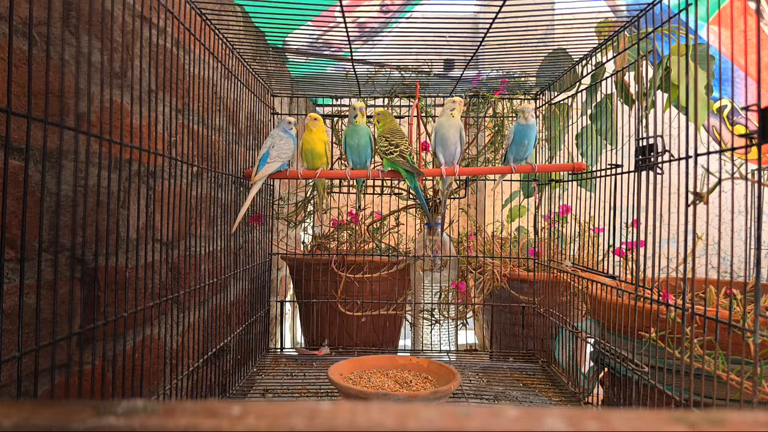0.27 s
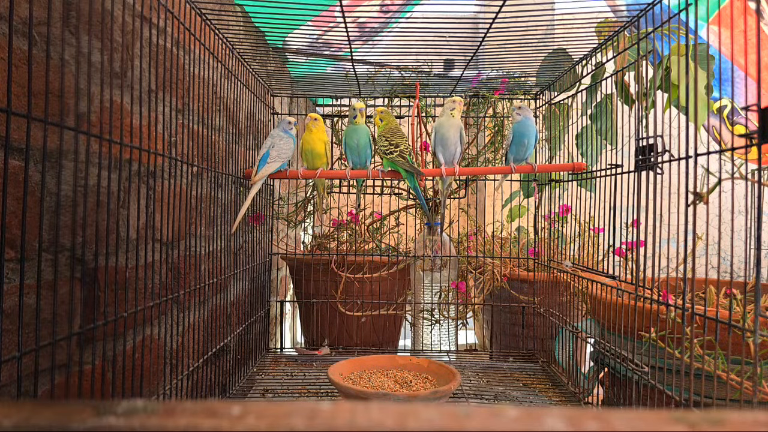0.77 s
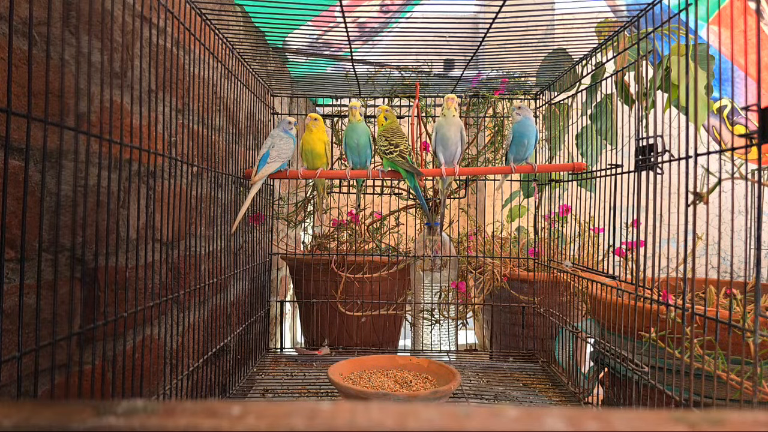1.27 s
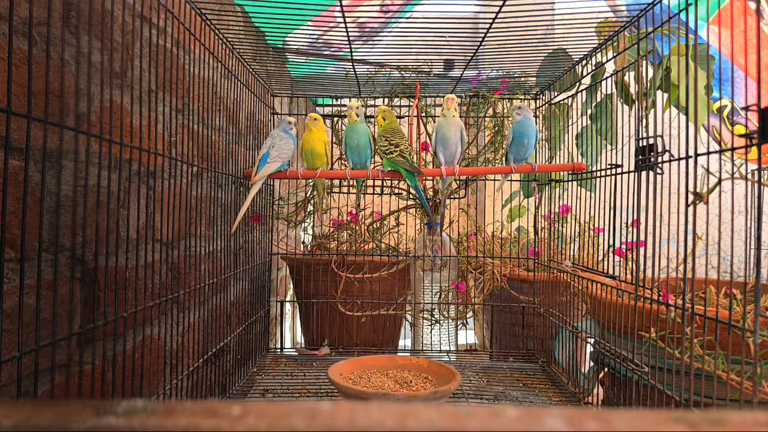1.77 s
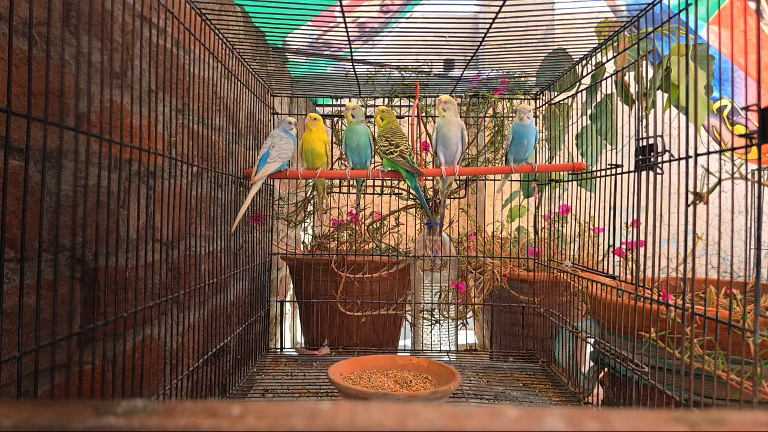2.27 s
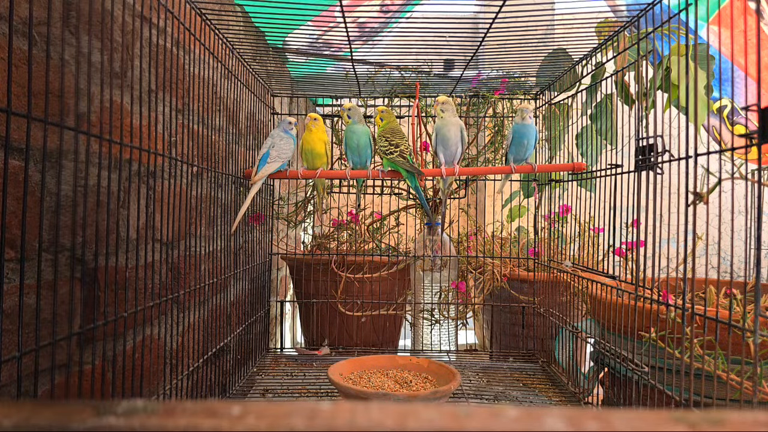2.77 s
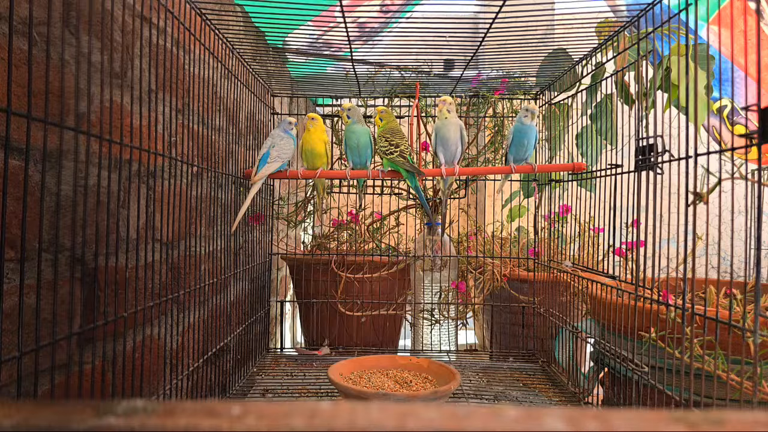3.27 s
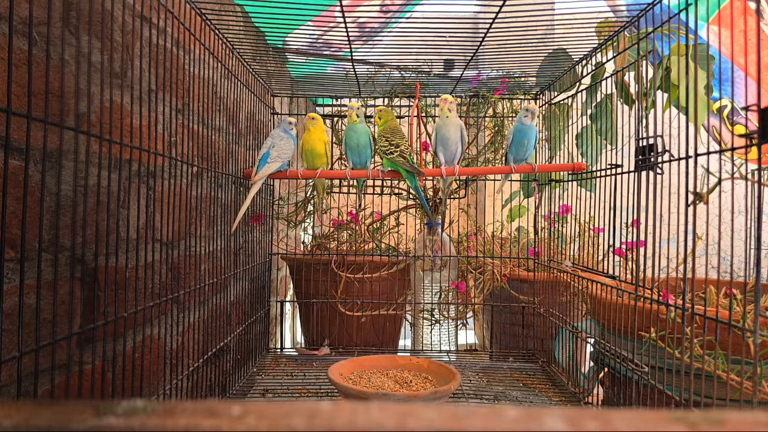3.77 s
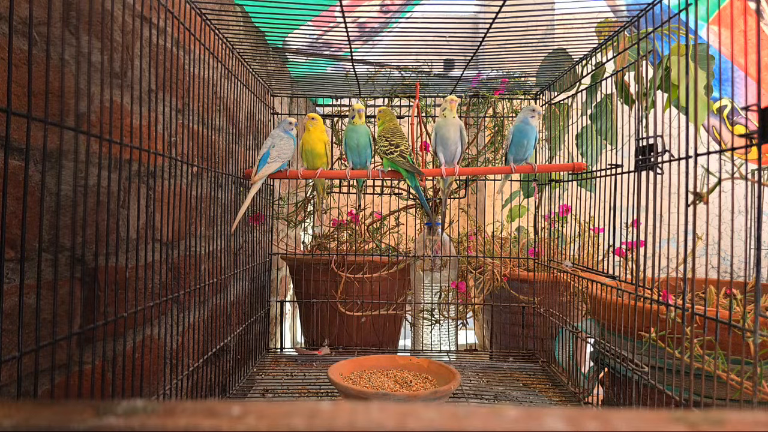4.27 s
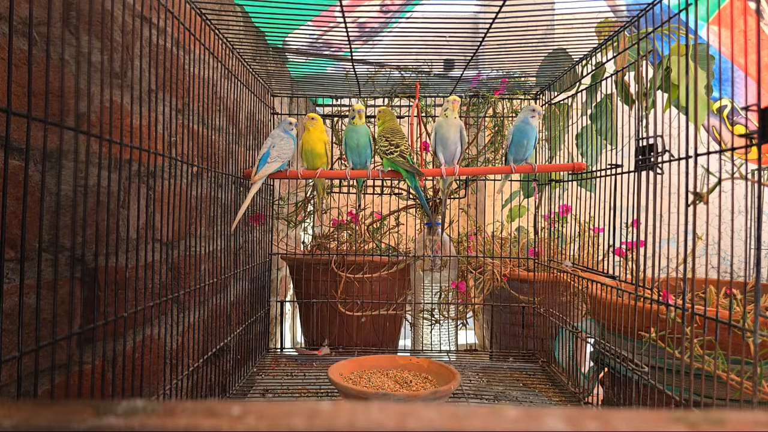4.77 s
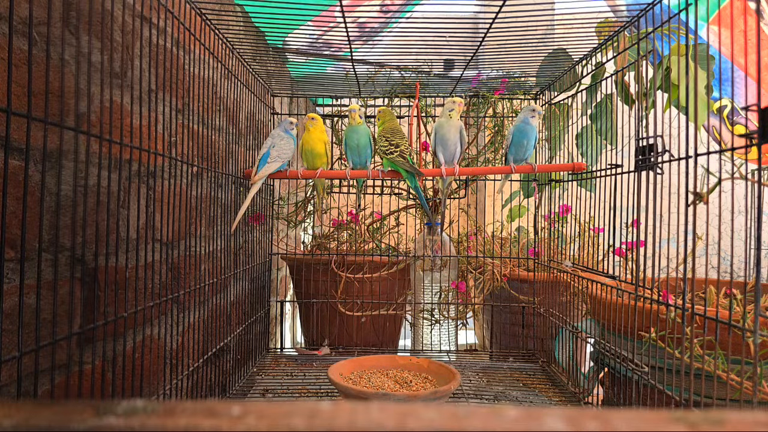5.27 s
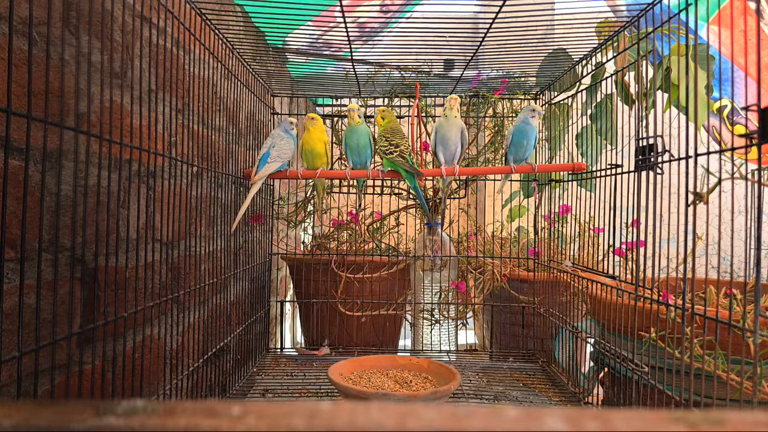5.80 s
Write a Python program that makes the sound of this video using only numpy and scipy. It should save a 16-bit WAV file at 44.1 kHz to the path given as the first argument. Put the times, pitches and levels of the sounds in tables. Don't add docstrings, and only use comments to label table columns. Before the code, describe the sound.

Close budgerigars give paired contact chirps, each about a tenth of a second: a bright, rasping high call, then a softer, lower answer. Pairs come at the start, middle and end, with long gaps. Underneath, low traffic booms and faint hiss rise and fade; distant birds tremble quietly, and a far car horn sounds briefly around two seconds. Near walls add a short reverberation to a close phone-type microphone.

```python
import sys
import numpy as np
from scipy import signal
from scipy.fft import rfft, irfft, next_fast_len
from scipy.io import wavfile
from scipy.ndimage import map_coordinates

SR = 44100
rng = np.random.default_rng(int(sys.argv[2]) if len(sys.argv) > 2 else 0)


def attenuation_scalar(level_db):
    decades = np.asarray(level_db, float) / 20
    return 10 ** decades


def file_out(sig):
    cols = np.atleast_2d(sig).T
    lim = np.clip(cols, -1, 1)
    pcm = np.round(lim * 32767).astype(np.int16)
    wavfile.write(sys.argv[1], SR, pcm)


N = 266275

# start_s, length_s, rasp_db, low_rasp_over_it_db, air_over_it_db
HIGH_CALLS = [
    (0.253, 0.13, -0.5, -2, 7.5),
    (3.084, .122, 0.5, -6.5, -1),
    (5.459, 0.13, 1.5, 7, -4.5),
]
# start_s, length_s, rasp_db, low_rasp_over_it_db, air_over_it_db
LOW_CALLS = [
    (0.838, 0.11, -0.78, 8, 0),
    (3.314, 0.11, 0.17, 3.5, 0.11),
    (5.735, 0.1114, 0.29, 5.5, 0.76),
]
BREATH_S = 0.013


def unit(x):
    return x / np.sqrt(np.mean(x ** 2) + 1e-20)


def along(points, hz):
    f, v = np.transpose(points)
    return np.interp(np.log(hz + 1), np.log(f + 1), v)


def curves(rows, outside=None):
    s, *columns = np.transpose(rows)
    t = np.arange(N) / SR
    return np.array([np.interp(t, s, c, outside, outside) for c in columns])


def wobble(rate):
    knots = rng.standard_normal(int(N * rate / SR) + 4)
    return map_coordinates(knots, [np.arange(N) * rate / SR])


def filtered(x, gain):
    m = next_fast_len(N + 8192)
    return irfft(rfft(x, m) * gain(np.fft.rfftfreq(m, 1 / SR)), m)[:N]


def noise(spectrum):
    return unit(filtered(rng.standard_normal(N), lambda hz: attenuation_scalar(along(spectrum, hz))))


def echoes(x, t60, gap):
    hz, t, z = signal.stft(rng.standard_normal(SR // 2), SR, nperseg=128)
    decay = attenuation_scalar(-60 * t / along(t60, hz)[:, None])
    tail = signal.istft(z * decay, SR, nperseg=128)[1]
    delayed = np.pad(x, (int(gap * SR), 0))
    return signal.fftconvolve(delayed, tail / np.linalg.norm(tail))[:N]


def hiss(swing_db):
    # frequency_hz, density_db
    hiss_spectrum = [(700, -29), (1200, -1), (2400, -8.5), (3400, -13), (7000, -18), (12500, -15.5),
                     (16000, -19)]
    return attenuation_scalar(-83 + .2 * swing_db + .9 * wobble(3.3)) * noise(hiss_spectrum)


def traffic():
    # time_s, firing_rate_hz, share_of_rumble (0-1)
    engine_pass = [(0, 17.2, .5), (.4, 18.3, .7), (.9, 20.9, .7), (1.25, 22.2, .6), (1.9, 24.3, .7),
                   (2.3, 25.2, .6), (2.8, 24.7, .4), (3.5, 25, .08), (6.04, 25.5, .08)]
    # time_s, level_db
    road = [(0.0, -33), (0.47, -44), (0.64, -46.5), (0.82, -46.5), (1.02, -41), (1.6, -47.5), (1.93, -43.5),
            (2.72, -44.5), (3.85, -58.5), (5.35, -47), (5.92, -59), (6.04, -62.5)]
    # centre_s, width_s, thud_over_mean_db
    lorries = [
        (0, 0.47, 3.5),
        (1.799, 0.56, -10),
        (2.8, 0.44, 12),
    ]
    # frequency_hz, density_db
    thud = [(22, -40), (45, -20), (64, -9), (77, 0), (90, -10), (110, -22), (200, -80)]
    boom = [(80, -60), (108, -26), (120, -5), (128, 0), (137, -9), (150, -17), (170, -30), (260, -80)]
    roar = [(100, -40), (165, -6), (250, -10), (288, -11), (300, 0), (312, -12), (580, -23), (2500, -51),
            (5500, -120)]

    firing_hz, share = curves(engine_pass)
    share = np.clip(share, 0, 1)
    turns = np.cumsum(firing_hz * (1 + .012 * wobble(6.1))) / SR
    firings = np.diff(np.floor(turns), prepend=0) * attenuation_scalar(0.98 * wobble(24))
    firings = echoes(firings, [(50, 0.17), (500, 1.0)], gap=0)

    t = np.arange(N) / SR
    boom_db = curves(road)[0]
    swing_db = boom_db - boom_db.mean()
    thud_db = -57.5 + sum(db * np.exp(-((t - s) / width) ** 2) for s, width, db in lorries)
    roar_db = boom_db.mean() - 11 + 0.65 * swing_db
    out = hiss(swing_db)
    for db, spectrum in zip([thud_db, boom_db, roar_db], [thud, boom, roar]):
        engine = unit(filtered(firings, lambda f: attenuation_scalar(along(spectrum, f)) / (1 + (f / 450) ** 4)))
        tyres = attenuation_scalar(1.6 * wobble(7)) * noise(spectrum)
        out += attenuation_scalar(db) * (np.sqrt(share) * engine + np.sqrt(1 - share) * tyres)
    return out


def horn():
    # multiple, level_db
    partials = [(4, -87), (5, -87), (6, -71), (7, -75), (8, -80), (9, -82), (12, -95)]
    # time_s, level_db
    blast_points = [
        (1.74, -36.5),
        (1.76, -10.5),
        (1.95, 0),
        (2.04, -1),
        (2.17, -5.5),
        (2.24, -13),
        (2.3, -15),
        (2.36, -44),
    ]
    phase = 2 * np.pi * np.cumsum(429.6 + 1.6 * wobble(18)) / SR
    buzz = sum(attenuation_scalar(db + 3 + 4 * wobble(16)) * np.sin(k * phase) for k, db in partials)
    blur_spectrum = [(1200, -28.0), (2300, -2), (3200, -2.5), (4200, -12), (6000, -25), (11000, -31.5)]  # Hz, dB
    blur = attenuation_scalar(-68) * noise(blur_spectrum)
    blast = attenuation_scalar(curves(blast_points, outside=-89.5)[0])
    return blast * (blast * buzz + blur)


def far_calls():
    # start_s, length_s, pitch_hz, warble_hz, level_db
    chatter = [(0, 0.055, 2545, 40.4, -63), (.08, .1, 4950, 200, -83), (0.62, .2, 1956, 132.4, -75),
               (0.659, 0.079, 4710, 151.3, -88), (1.202, .1, 1700, 59.7, -90), (1.43, 0.15, 3400, 251, -87),
               (1.615, 0.3, 1100, 200, -80), (1.912, 0.2, 1903, 220.4, -71), (2.33, 0.18, 852, 119.7, -70),
               (2.546, 0.17, 3700, 201, -83.5), (2.78, 0.098, 5000, 200.5, -88),
               (2.896, 0.16, 1637, 119.7, -69.5), (3.533, 0.13, 1700, 99.5, -79.5),
               (3.6, 0.078, 5000, 196.6, -91), (3.674, .22, 401, 49.1, -71), (4.079, 0.24, 1710, 88.6, -82),
               (4.104, 0.27, 3550, 222, -76), (4.43, 0.14, 5200, 202, -84.5), (4.6, .08, 2000, 200, -82),
               (4.719, .3, 3500, 221, -76.5), (4.918, 0.074, 1700, 589, -77.5),
               (4.152, 0.26, 2780, 598, -83.5), (5.22, 0.15, 4300, 151.3, -85),
               (5.267, 0.2, 2000, 130.3, -74.5)]
    out = np.zeros(N)
    t = np.arange(N) / SR
    tremble = wobble(380) * np.abs(wobble(83)) + 0.49 * wobble(43)
    for s, length, hz, warble_hz, db in chatter:
        u = np.clip((t - s) / length, 0, 1)
        phase = 2 * np.pi * np.cumsum(hz + 1.3 * warble_hz * tremble) / SR
        out += attenuation_scalar(db + 4) * np.sin(np.pi * u) ** .6 * np.sin(phase)
    return 0.7 * out + echoes(out, [(1000, .4), (5000, .3)], gap=0.02)


def unrest():
    steady, raw, settle_s = .6, 1.9, .05
    t = np.arange(N) / SR
    starts = [call[0] for call in HIGH_CALLS + LOW_CALLS]
    return steady + raw * sum((t > s - BREATH_S) * np.exp(-(np.maximum(t - s, 0) / settle_s) ** 2) for s in starts)


def tune(rows):
    pull, pull_max_hz, rise_hz_per_s = .3, 200, 3500
    s, length, hz, db = np.transpose(rows)
    step = np.append(np.diff(hz) * (np.diff(s) < .1), 0)
    bend = np.clip(pull * step, -pull_max_hz, pull_max_hz) + rise_hz_per_s * length
    return list(zip(s, length, hz, bend, db))


def graces(calls, pattern):
    detune, scatter_db = .012, 1.5
    chance = iter(rng.standard_normal((len(calls) * len(pattern), 2)))
    return [(call[0] + s, length, hz * (1 + detune * a), bend, db + scatter_db * b)
            for call in calls for (s, length, hz, bend, db), (a, b) in zip(pattern, chance)]


def warble():
    # start_s, length_s, pitch_hz, peak_db
    high_tune = [(.256, 0.014, 3600, -14.5), (.274, 0.018, 3253, -11.5), (.298, 0.0019, 3173, -11.5),
                 (.302, 0.019, 3600, -6.5), (.319, .007, 3764, -12.5), (.328, 0.014, 3687, -5),
                 (.343, 0.011, 2965, -13.5), (.353, 0.017, 3220, -11), (.369, 0.0096, 3575, -5),
                 (.382, 0.009, 3505, -8.5), (3.084, .009, 3220, -18.5), (3.1, 0.023, 3190, -10.5),
                 (3.121, 0.011, 3070, -11), (3.132, 0.017, 3673, -4), (3.157, 0.012, 3686, -7),
                 (3.166, 0.012, 3250, -11.5), (3.176, 0.021, 3130, -7.5), (3.197, 0.014, 3086, -15.5),
                 (3.2, 0.013, 3546, -5), (5.454, 0.012, 3510, -18), (5.467, .014, 3670, -19),
                 (5.478, 0.031, 3090, -19), (5.503, .019, 2910, -11.5), (5.531, 0.0079, 3150, -10.5),
                 (5.533, 0.014, 3606, -5), (5.55, 0.0099, 3700, -12), (5.561, 0.012, 2823, -11),
                 (5.563, 0.014, 3627, -13.5), (5.579, 0.01, 2892, -12), (5.586, 0.0067, 3280, -18)]
    low_tune = [(.84, 0.0038, 3475, -22.5), (.852, 0.0062, 2815, -17.5), (.862, 0.0017, 2540, -17),
                (.874, 0.0087, 2650, -19.5), (.884, 0.0038, 2650, -17), (.9, .008, 2310, -21),
                (.908, 0.0051, 2641, -10.5), (.917, .004, 2807, -16.5), (.925, .016, 2714, -9.5),
                (.94, 0.012, 3018, -21), (3.322, 0.0079, 3024, -28.5), (3.33, 0.018, 2610, -23.5),
                (3.347, .017, 2685, -26.5), (3.357, 0.0033, 2445, -27), (3.371, 0.0031, 2674, -12.5),
                (3.382, 0.013, 2706, -12), (3.403, 0.013, 2720, -14), (3.416, 0.011, 3100, -18.5),
                (3.42, 0.0086, 2857, -26.5), (5.733, 0.012, 3440, -19), (5.745, 0.011, 2775, -20),
                (5.765, 0.0037, 2615, -15.5), (5.781, 0.02, 2639, -17), (5.793, 0.0053, 2696, -22.5),
                (5.803, 0.016, 2661, -12), (5.819, 0.0056, 2760, -8), (5.833, 0.016, 2760, -23.5),
                (5.837, .009, 3100, -20.5)]
    # start_s, length_s, pitch_hz, bend_hz, peak_db
    high_grace = [(.008, 0.035, 4520, -100, -25.5), (.013, .008, 2910, 20, -15.5),
                  (.03, .016, 2500, -400, -28.5), (0.053, .009, 3190, 84.5, -21),
                  (0.09, .008, 3620, -71, -14.5), (.115, 0.012, 3100, 61.5, -15),
                  (.138, 0.0099, 3580, -61, -16.5)]
    low_grace = [(.001, 0.016, 4025, -500, -30.5), (.011, .012, 3282, -700, -23),
                 (.023, 0.016, 2160, 87.5, -20.5), (.07, .007, 2340, 28.5, -19),
                 (.115, .013, 2858, 296.5, -27.5)]
    # start_s, length_s, pitch_hz, bend_hz, peak_db
    neighbour = [
        (5.488, 0.0094, 2014, -36, -25.5),
        (5.504, .006, 4510, 56, -18.5),
        (5.515, .008, 4350, -120, -17.5),
        (5.516, .012, 2037, -250, -28),
        (5.551, 0.0066, 1828, 173.5, -24),
    ]
    # multiple, level_db
    overtones = [(2, -28), (3, -38)]

    notes = tune(high_tune) + tune(low_tune) + neighbour
    notes += graces(HIGH_CALLS, high_grace) + graces(LOW_CALLS, low_grace)
    out = np.zeros(N + SR)
    quaver_hz = 45 * unrest() * wobble(400)
    flutter_db = 1.76 * unrest() * wobble(450)
    for (s, length, hz, bend, db), (start, gape) in zip(notes, rng.random((len(notes), 2))):
        first, n = round((s - .0015) * SR), round((length + 0.0032) * SR)
        span = slice(first, first + n)
        u = np.arange(n) / n
        phase = 2 * np.pi * (np.cumsum(hz + bend * u + quaver_hz[span]) / SR + start)
        arch = np.minimum(1, 1.45 * np.sin(np.pi * u ** 1.2))
        swell = np.sin(np.pi / 2 * arch) ** 2
        bright_db = 9 * (gape - .5) + 0.6 * (db + 8.5)
        tone = np.sin(phase) + sum(attenuation_scalar(g + bright_db) * np.sin(k * phase) for k, g in overtones)
        out[span] += swell * attenuation_scalar(db + flutter_db[span]) * tone
    return out[:N]


def breath(call, layers, catch_db):
    onset_db = 46
    catch_s, catch_width_s = .063, 0.018
    s, length, db, low_db, air_db = call
    t = np.arange(N) / SR - s + BREATH_S
    top_db, top_s, drift, release = np.transpose(layers)[..., None]
    swell_db = -onset_db * (1 - t / top_s) ** 2
    shape_db = np.where(t < top_s, swell_db, drift * np.minimum(t - top_s, length))
    shape_db -= release * np.maximum(t - BREATH_S - length, 0)
    shape_db -= catch_db * np.exp(-((t - catch_s) / catch_width_s) ** 2)
    layer_db = np.array([[low_db], [0], [0], [0], [air_db]])
    return attenuation_scalar(np.maximum(top_db + db + layer_db + shape_db, -200)) * (t > 0)


def rasp():
    # top_db, rise_s, drift_db_per_s, release_db_per_s
    high_layers = [
        (-44.5, 0.055, -120, 501),
        (-29.5, .022, -160, 600),
        (-29, 0.027, -85, 600),
        (-28, 0.028, -110, 550),
        (-41.5, .018, -25, 901),
    ]
    low_layers = [
        (-45.5, .04, -150, 490),
        (-47, 0.0096, -120, 500),
        (-40.5, 0.027, -30, 1100),
        (-55.5, .022, 90.5, 564.5),
        (-49, 0.026, 123.5, 2400),
    ]
    # centre_hz, width_hz
    rasp_bands = [
        (2307, 2100),
        (4400, 1100),
        (3260, 1600),
        (6840, 35000),
        (5910, 850),
        (8580, 1700),
    ]
    # frequency_hz, density_db
    air_spectrum = [(11000, -42.5), (11800, 0.5), (15800, -1)]

    slaps = np.sin(np.pi * np.cumsum(330 + 110 * wobble(60)) / SR) ** 2
    gains = sum(breath(c, high_layers, 0) for c in HIGH_CALLS)
    gains = gains + sum(breath(c, low_layers, 6.5) for c in LOW_CALLS)
    low, upper, beak, overtone, air = gains
    throat = attenuation_scalar(4) * (low + upper)
    levels = [low, upper, throat, attenuation_scalar(-4) * beak, attenuation_scalar(-4.0) * overtone, attenuation_scalar(-6.5) * beak]
    out = air * attenuation_scalar(3.5 * wobble(60)) * noise(air_spectrum)
    for level, (centre, width) in zip(levels, rasp_bands):
        puffs = rng.standard_normal(N) * (.9 + slaps) * attenuation_scalar(5.5 * wobble(90))
        out += level * unit(filtered(puffs, lambda hz: 1 / (1 + (2 * (hz - centre) / width) ** 4)))
    return filtered(out, lambda hz: .05 + 1 / (1 + (1800 / (hz + 1)) ** 6))


def budgerigars():
    # frequency_hz, t60_s
    cage = [(2000, 0.14), (8000, 0.036)]
    yard = [(1500, .25), (3000, 0.28), (5000, .3), (14000, .16)]
    t = np.arange(N) / SR
    voice = attenuation_scalar(-2) * warble() + rasp()
    out = voice.copy()
    for s, length, *_ in HIGH_CALLS + LOW_CALLS:
        call = voice * (t > s - .03) * (t < s + length + .08)
        out += attenuation_scalar(-7.5) * echoes(call, cage, gap=.003)
        out += attenuation_scalar(-23.0) * echoes(call, yard, gap=.012)
    return out


def scene():
    return (budgerigars() + far_calls() + horn() + traffic())[None]


def roll_off(x):
    return signal.sosfilt(signal.butter(12, 16530, fs=SR, output="sos"), x)


def record(dry):
    # start_s, end_s
    skip = (5.7916, 5.7944)
    # time_s, level_db
    tick = (5.8145, -27)
    # frequency_hz, gain_db
    microphone = [(25, -5), (50, -4.5), (70, 0), (100, 3), (160, 0), (300, -1.5), (700, 2), (1500, 1)]
    top_hz = 15970
    t = np.arange(N) / SR
    kept = dry * ((t < skip[0]) | (t > skip[1]))
    click = attenuation_scalar(tick[1]) * np.exp(-.5 * ((t - tick[0]) / .00008) ** 2)
    rounded = (kept + click) / (1 + np.abs(kept / .93) ** 10) ** (1 / 10)
    mix = filtered(rounded[0], lambda hz: attenuation_scalar(along(microphone, hz)) * np.clip((top_hz - hz) / 120, 0, 1))[None]
    return roll_off(mix)


dry = scene()
out = record(dry)
file_out(out)
```